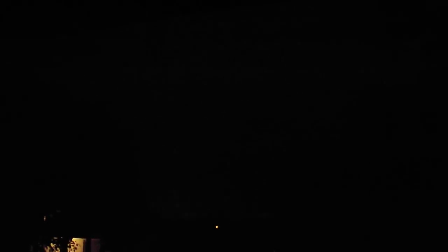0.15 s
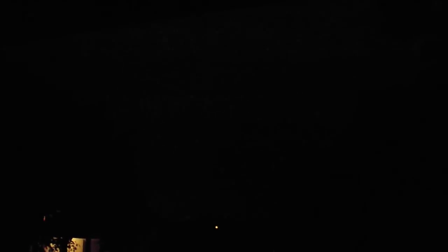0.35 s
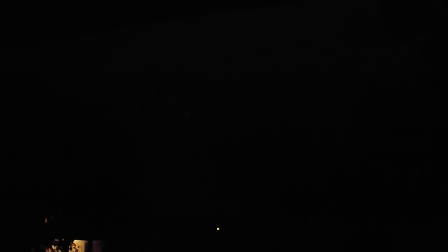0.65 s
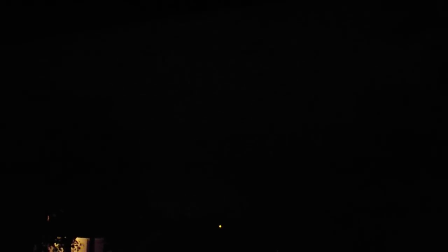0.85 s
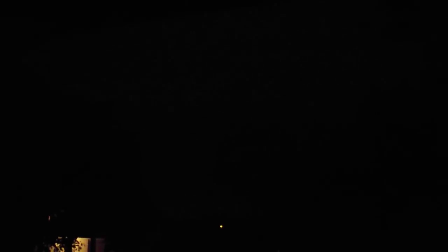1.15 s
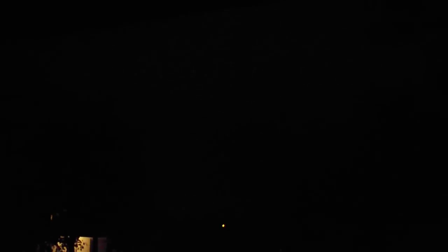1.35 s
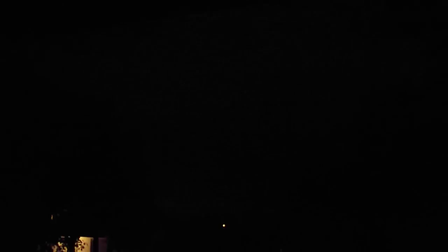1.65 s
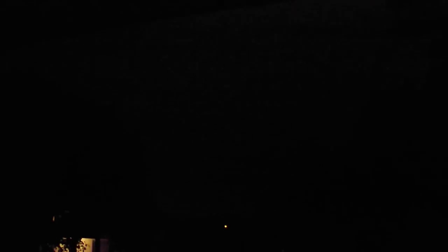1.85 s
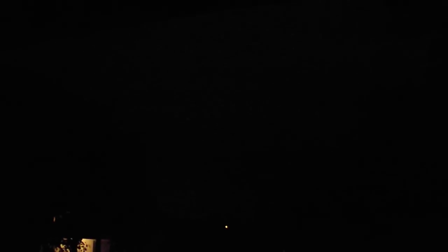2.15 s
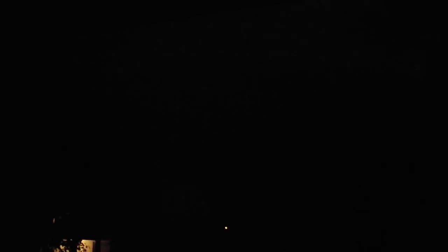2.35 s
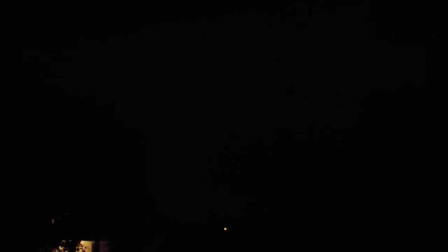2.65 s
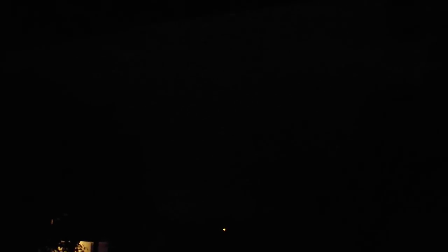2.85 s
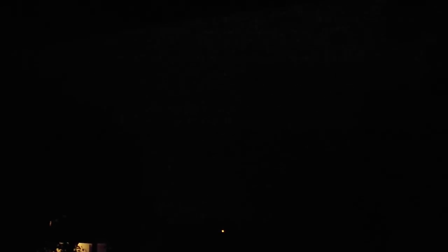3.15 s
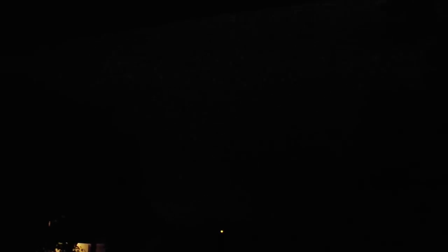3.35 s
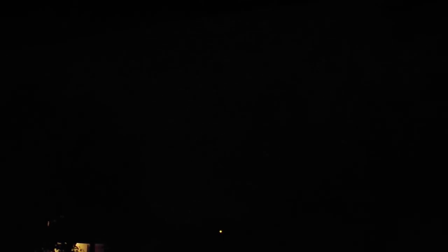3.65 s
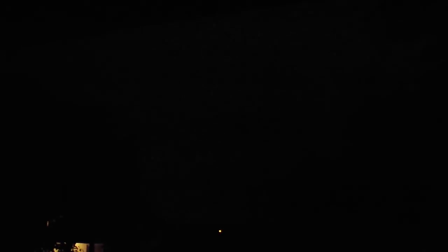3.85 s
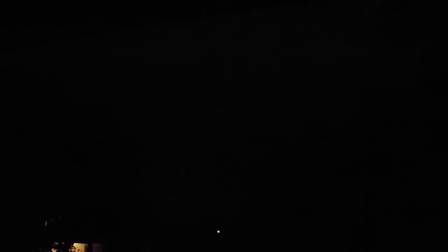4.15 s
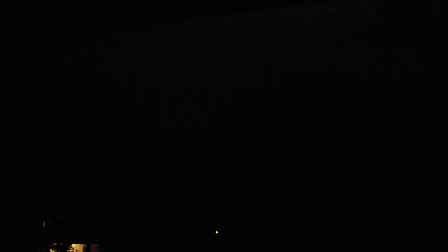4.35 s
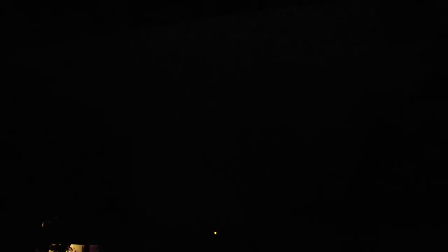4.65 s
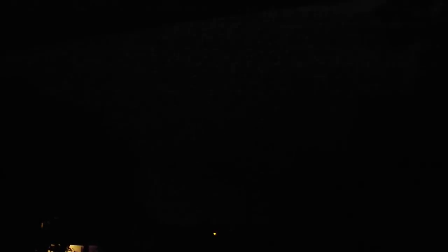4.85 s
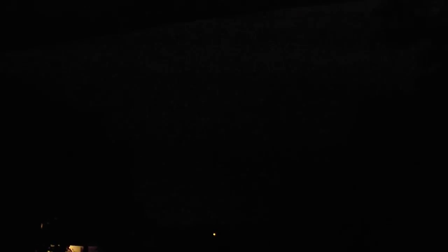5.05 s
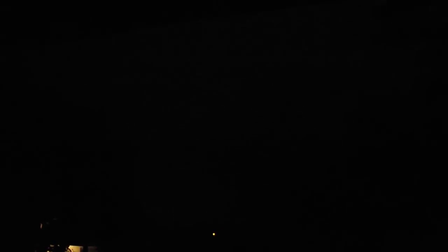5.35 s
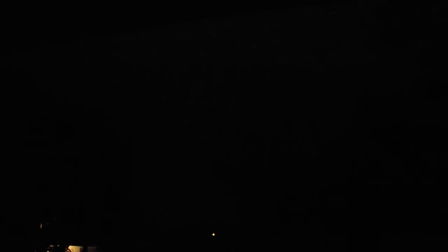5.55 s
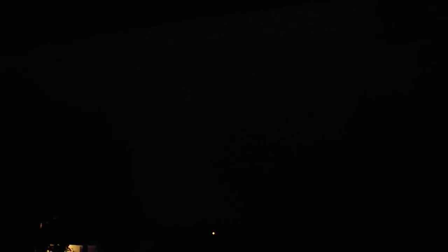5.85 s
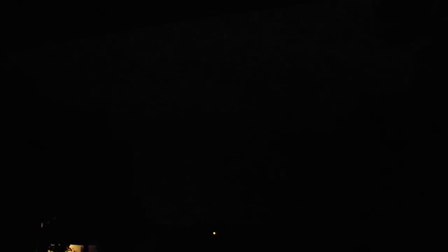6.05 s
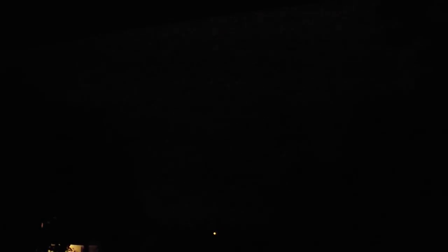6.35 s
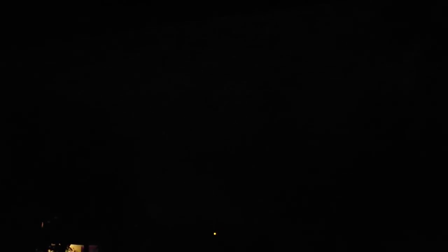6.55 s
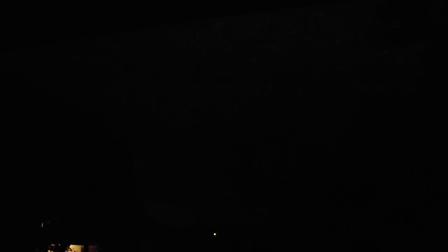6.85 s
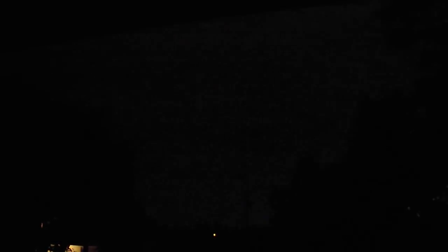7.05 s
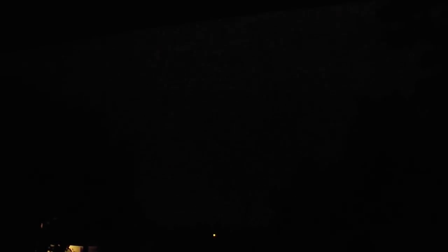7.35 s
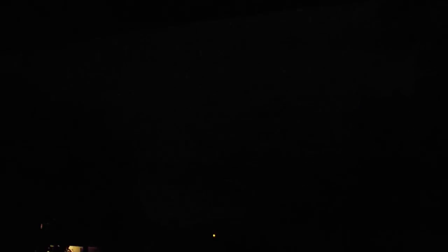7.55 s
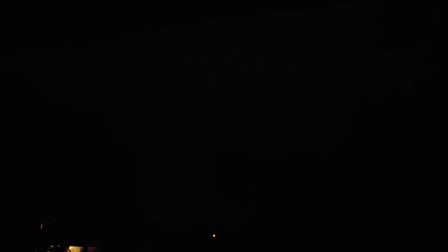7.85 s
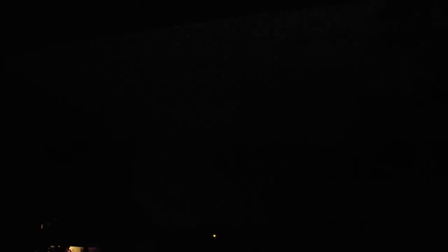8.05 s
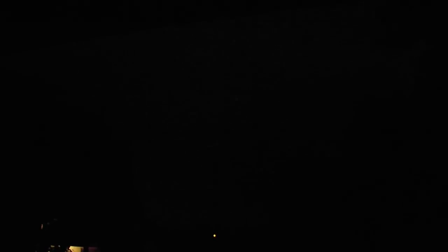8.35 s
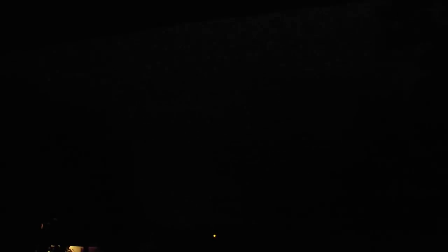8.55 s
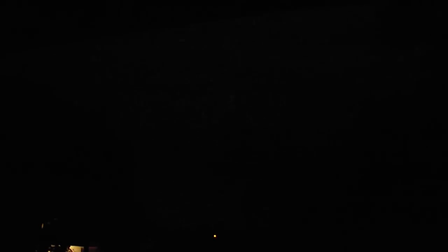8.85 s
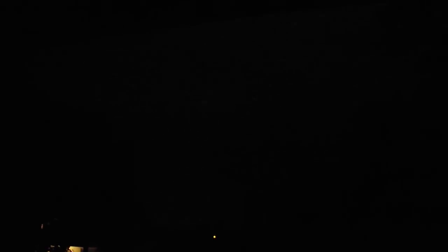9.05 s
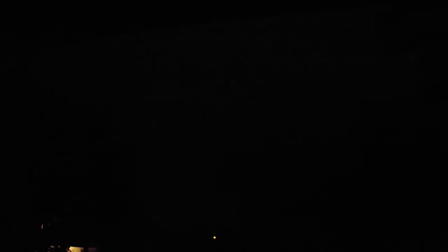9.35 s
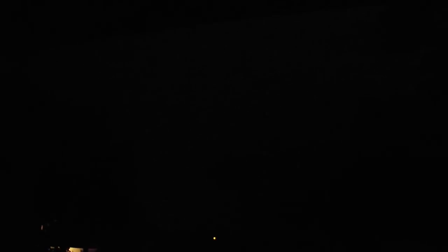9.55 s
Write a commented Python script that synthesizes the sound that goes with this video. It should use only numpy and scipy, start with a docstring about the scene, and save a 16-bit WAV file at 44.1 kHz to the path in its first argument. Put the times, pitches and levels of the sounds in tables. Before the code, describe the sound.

Distant thunder rolls at night, fading, then building through dull claps to a peak and rumbling on, behind a steady dense chorus of frogs and insects.

```python
"""A steady, far-off chorus of frogs and insects at night, with distant thunder rolling behind it.
A first roll fades, a second builds through several dull claps to its peak and rumbles on.
Frogs and insects are pulsed calls with diffuse echoes, shaped by resonances; thunder is filtered shock fronts.
Noise makes the even wash of the night; the microphone adds a faint hiss and a thin whine."""
import sys
import numpy as np
from scipy import signal
from scipy.fft import rfft, irfft, next_fast_len
from scipy.io import wavfile

SR = 44100
rng = np.random.default_rng(int(sys.argv[2]) if len(sys.argv) > 2 else 0)


def store_pcm(level_fs):
    """Save levels as 16-bit WAV."""
    pcm = np.round(np.clip(level_fs, -1, 1) * 32767).astype(np.int16)
    wavfile.write(sys.argv[1], SR, np.atleast_2d(pcm).T)


N = 427329
TIME, FREQS = np.arange(N) / SR, np.fft.rfftfreq(N, 1 / SR)  # s, Hz


def amp(db):
    """Decibels to gain."""
    return 10 ** (np.asarray(db) / 20)


def unit(x):
    """Scales to rms 1."""
    return x / np.sqrt(np.mean(x ** 2) + 1e-20)


def slope(points):
    """Gain at every frequency from (Hz, dB) points, joined on a logarithmic pitch scale."""
    hz, db = np.transpose(points)
    return amp(np.interp(np.log(FREQS + 1), np.log(hz), db))


def humps(modes):
    """Gain at every frequency from bell-shaped resonances (Hz, width in Hz at half power, dB)."""
    power = sum(amp(db) ** 2 * .5 ** ((2 * (FREQS - hz) / width) ** 2) for hz, width, db in modes)
    return np.sqrt(power)


def colour(x, gain):
    """Filters x by a gain at every frequency; rms 1."""
    size = next_fast_len(N)
    size_gain = np.interp(np.fft.rfftfreq(size, 1 / SR), FREQS, gain)
    return unit(irfft(rfft(x, size) * size_gain, size)[:N])


def calls(per_s, length, pulses_per_s, t60, echo_db, spread_db):
    """Many callers taking turns: each call is a burst of pulses trailed by its diffuse echo.

    Typical length and echo decay time t60 are in seconds; echo_db is relative to the direct calls.
    """
    count = int(per_s * (N / SR + 1))
    longest = SR // 2
    voices, echo_power = np.zeros(N + 4 * SR), np.zeros(N + 4 * SR)
    for k, (late, near, rasp, hold) in enumerate(rng.uniform(-1, 1, (count, 4))):
        start = int(((k + late) / per_s + 1) * SR)
        span = min(int(length * (1 + 0.21 * hold) * SR), longest)
        swell = amp(spread_db * near) * np.sin(np.pi * np.arange(span) / span)
        period = SR / (pulses_per_s * (1 + .35 * rasp))  # samples
        beats = np.arange(0, span / period, 1)
        uneven_beats = beats + .1 * rng.standard_normal(len(beats))
        at = np.clip(uneven_beats * period, 0, span - 1).astype(int)
        voices[start + at] += swell[at] * np.sqrt(period)  # same power at any pulse rate
        echo_power[start:start + span] += swell ** 2
    keep = np.exp(-np.log(1e6) / (t60 * SR))  # power falls 60 dB in t60
    echo_level = np.sqrt(signal.lfilter([1 - keep], [1, -keep], echo_power))
    echo = echo_level * rng.standard_normal(len(voices))
    return (voices + amp(echo_db) * echo)[int(1.8 * SR):][:N]  # start with the chorus under way


def frogs(honk_db=-46, quack_db=-45.5, trill_db=-40.5):
    """Three kinds of frog call across one another, each through its own throat and vocal sac."""
    # Resonances of three kinds of frog. Each row: centre in Hz, width in Hz, relative level in dB.
    honkers = [(970, 240, -9.5), (1284, 130, 4), (1444, 91, 5), (1634, 87, -7.5)]
    quackers = [(2215, 167, 0), (2517, 105, 1.5), (2740, 420, 2), (4360, 430, 2), (4680, 530, -4),
                (4880, 285, 5.5), (5290, 620, -11)]
    trillers = [(3100, 163, -3), (3285, 125, 3.5), (3471, 250, -3.5), (6600, 280, -28)]
    honks = calls(per_s=44, length=.045, pulses_per_s=160, t60=0.58, echo_db=2, spread_db=4.5)
    quacks = calls(per_s=46, length=.07, pulses_per_s=110, t60=0.36, echo_db=5.5, spread_db=2.5)
    trills = calls(per_s=44, length=.04, pulses_per_s=95, t60=0.51, echo_db=4.5, spread_db=2.0)
    # the frogs briefly egg one another on: one swell of the whole chorus
    surge_s, surge_half_s, surge_db = 0.76, 0.22, 2.1
    surge = amp(surge_db * np.exp(-((TIME - surge_s) / surge_half_s) ** 2))
    return surge * (amp(honk_db) * colour(honks, humps(honkers))
                    + amp(quack_db) * colour(quacks, humps(quackers))
                    + amp(trill_db) * colour(trills, humps(trillers)))


def insects(db=-58):
    """Wing strokes of far insects merge into a thin, high sizzle."""
    # Bands in which the insects buzz. Each row: centre in Hz, width in Hz, relative level in dB.
    buzz_bands = [(6110, 1230, 2.5), (7310, 170, 4.5), (7560, 360, 3.5), (7870, 310, 5), (8350, 770, -2.5)]
    strokes = calls(per_s=57, length=0.086, pulses_per_s=330, t60=0.39, echo_db=6, spread_db=1.5)
    return amp(db) * colour(strokes, humps(buzz_bands))


def walls():
    """Reflections from nearby walls and ground lift or cancel some low pitches: gain at every frequency."""
    # Lifted and cancelled pitches. Each row: centre in Hz, width in Hz at half the dB, change in dB.
    reflections = [(86.8, 19, -5.5), (101.5, 30, 3), (163.3, 14.3, 3.5), (328, 18.6, -4), (360, 30, 1.5)]
    return amp(sum(db * .5 ** ((2 * (FREQS - hz) / width) ** 2) for hz, width, db in reflections))


def night(db=-44.5):
    """The even wash of everything too far away to tell apart: filtered noise."""
    # Blur of the farthest callers and the night air. Each row: frequency in Hz, relative level in dB.
    far_blur = [(100, 9), (160, 6.5), (400, -6.5), (600, 0), (1000, -2.5), (1400, -2.5), (1850, -7),
                (2600, -7.5), (3600, 0), (3950, -10.5), (5200, -5.5), (5800, -11.5), (6500, -56),
                (9000, -26.5)]
    return amp(db) * colour(rng.standard_normal(N), slope(far_blur) * walls())


def shocks(per_s, spread_db):
    """Shock fronts from the many kinks of the lightning channel, in random order and size."""
    size = amp(spread_db * np.minimum(rng.exponential(1, N), 3))
    sign = rng.choice([-1, 1], N)
    return size * sign * (rng.random(N) < per_s / SR)


def steadied(x, span):
    """Evens out swells slower than the span in seconds and keeps the fast flutter."""
    window = signal.windows.hann(int(span * SR) | 1)
    energy = signal.oaconvolve(x ** 2, window, "same")
    weight = signal.oaconvolve(np.ones(N), window, "same")  # allows for the ends
    return x / np.sqrt(np.abs(energy / weight) + 1e-9)


def lumps(per_s, depth_db):
    """Gain that wanders at random as stronger and weaker stretches of the channel are heard."""
    speeds = per_s * np.geomspace(.4, 1.6, 16)  # Hz
    t = TIME[::200]
    wander = unit(sum(np.sin(2 * np.pi * (speed * t + rng.random())) for speed in speeds))
    return amp(depth_db * np.interp(TIME, t, wander))


def thunder(body_db=0, edge_db=-0.3, deep_db=0.5, clap_db=-0.5, crack_db=-8):
    """Shock fronts, dulled by miles of air, swell into a lumpy roll and bunch into claps."""
    # Slow swell of the thunder, before the trims above. Each row: time in seconds, level in dB,
    # brighter edge and deep shudder, both in dB relative to that level.
    roll = [(0, -43.5, -3, 2), (0.1, -32.5, -11.5, -9), (0.55, -39.5, -8, -3.5), (1, -34, -13.5, -8),
            (1.95, -38.5, -9.5, 0.0), (2.3, -40, -8.5, -2.5), (3.7, -45, -12, -2.5),
            (4.45, -39.5, -15.0, -3), (4.7, -32.0, -7, -8.0), (5.22, -34.5, -9, -6),
            (5.31, -28, -10, -12.5), (5.62, -30.5, -11.5, -5), (6.05, -35, -8.5, -4.5),
            (7, -30.5, -10.0, -6.0), (7.22, -29.5, -9.0, -1.5), (7.72, -27.0, -5, -7),
            (8.15, -31.5, -9, -7.5), (8.85, -32.0, -3.5, -5), (9.1, -31, -10.5, -0.5),
            (9.69, -31.5, -10.0, -4)]
    # Claps, where many shock fronts arrive together, before the trim. Each row: time in seconds,
    # level in dB, half length in seconds, brighter edge and deep shudder in dB relative to that level.
    claps = [(0.18, -28.5, 0.024, -14, -8), (1.017, -28, 0.016, -12, -10), (1.238, -30, 0.02, -22, -20),
             (1.527, -31.5, 0.014, -18, -20), (1.632, -35, 0.023, -12, -17), (1.99, -35, 0.034, -20, 0),
             (3.266, -40, 0.036, -17, -16), (3.966, -39.5, .02, -25, -22), (4.631, -23.5, 0.022, -25, -20),
             (5.056, -25.5, 0.036, -16.5, -12), (5.61, -25, 0.016, -27, -7),
             (6.285, -28.5, 0.022, -25, -25), (6.991, -26, 0.0092, -25, -23), (7.16, -27, 0.025, -20, -2),
             (7.39, -26, .012, -22, -20), (7.648, -20, 0.023, -6.5, -11), (7.94, -32, .025, -10, 2),
             (8.492, -30, 0.0081, -7.5, 4), (8.92, -30, 0.02, -15, -12), (9.285, -31, 0.055, -10.5, -10)]
    # Spectra of the thunder's body, edge and shudder. Each row: frequency in Hz, relative level in dB.
    body_tone = [(70, -30), (100, -15), (135, -3.5), (170, 1), (200, -0.5), (290, 0), (380, -6),
                 (470, -15.5), (650, -24.5), (1200, -80)]
    edge_tone = [(250, -22), (400, 1.5), (490, -1.5), (620, -2.5), (830, -5.5), (960, -11.5), (1150, -18),
                 (1500, -50), (2500, -70)]
    deep_tone = [(6, -24), (18, -12), (38, 3.5), (50, -3), (62, -4), (84, -7.5), (110, -4), (135, -9),
                 (180, -21), (300, -65)]

    s, level_db, bright_db, low_db = np.transpose(roll)
    rolling = lumps(per_s=7, depth_db=0.5)
    deep_rolling = lumps(per_s=7, depth_db=1.0)
    # envelopes are kept as power, so that claps add to the roll
    body = (rolling * amp(body_db + np.interp(TIME, s, level_db))) ** 2
    edge = (rolling * amp(edge_db + np.interp(TIME, s, level_db + bright_db))) ** 2
    deep = (deep_rolling * amp(deep_db + np.interp(TIME, s, level_db + low_db))) ** 2
    crack = np.zeros(N)
    for at, db, half, sharp_db, thump_db in claps:
        burst = amp(db + clap_db) ** 2 * np.exp(-((TIME - at) / half) ** 2)
        body = body + burst
        edge = edge + burst * amp(sharp_db) ** 2
        deep = deep + burst * amp(thump_db) ** 2
        crack = crack + burst * amp(sharp_db) ** 4  # favours the upper crackle of the brightest claps
    echo_tail = np.exp(-TIME[:SR // 2] / 0.028) / (0.049 * SR)
    crack_echo = np.sqrt(signal.oaconvolve(crack, echo_tail)[:N].clip(0))

    # the brighter edge comes from the nearer branches, the body from the whole channel
    fronts = shocks(per_s=2400, spread_db=2.5)
    near_fronts = shocks(per_s=2600, spread_db=2.5)
    deep_fronts = shocks(per_s=900, spread_db=0.0)
    site = walls()
    return (np.sqrt(body) * steadied(colour(fronts, slope(body_tone) * site), span=0.13)
            + np.sqrt(edge) * steadied(colour(near_fronts, slope(edge_tone) * site), span=0.12)
            + amp(crack_db) * crack_echo * colour(near_fronts, humps([(1050, 320, 0)]))
            + np.sqrt(deep) * steadied(colour(deep_fronts, slope(deep_tone) * site), span=0.24))


def scene():
    """The night chorus with thunder behind it, on one channel."""
    return (frogs() + insects() + night() + thunder())[None]


def record(dry, hiss_db=-62.0):
    """Microphone hiss (shaped noise) and whine (steady sines), then the band limit."""
    # The microphone's whine. Each row: frequency in Hz, peak level in dB.
    whine_tones = [(6016, -77), (6543, -78), (7219, -76), (8021, -66.5), (11472, -83)]
    hiss_tone = slope([(5000, -0.55), (9500, 0.27), (12000, -0.67), (16000, -2)])  # Hz, dB
    hiss = amp(hiss_db) * colour(rng.standard_normal(N), hiss_tone)
    whine = sum(amp(db) * np.sin(2 * np.pi * hz * TIME) for hz, db in whine_tones)
    cutoff_hz = 15800
    lowpass = signal.firwin(511, cutoff_hz, window=("kaiser", 9), fs=SR)
    return signal.oaconvolve(dry + hiss + whine, lowpass[None], "same")


dry = scene()
out = record(dry)
store_pcm(out)
```